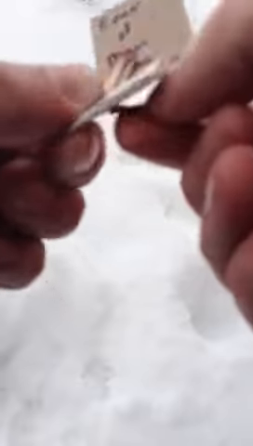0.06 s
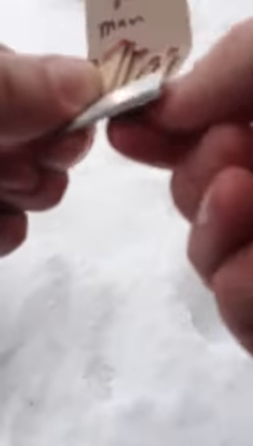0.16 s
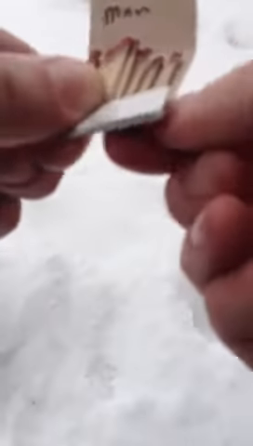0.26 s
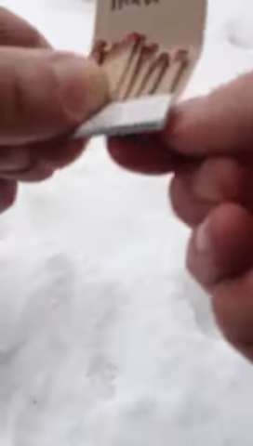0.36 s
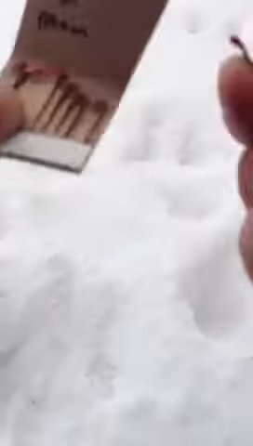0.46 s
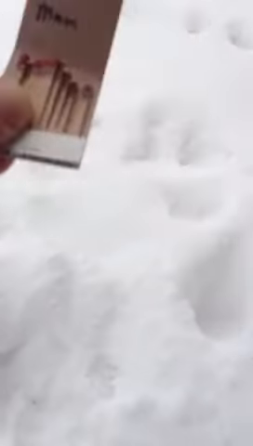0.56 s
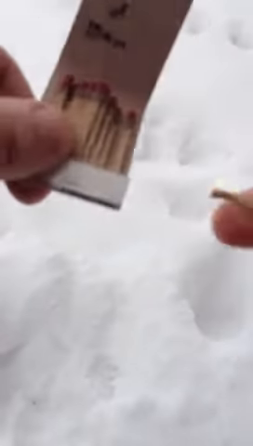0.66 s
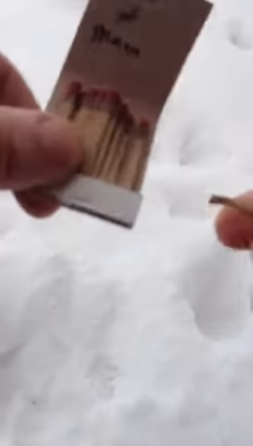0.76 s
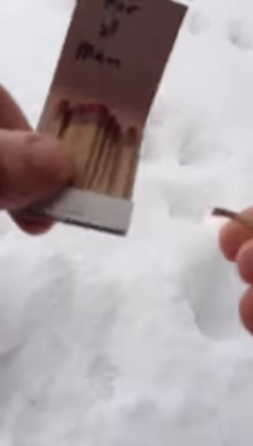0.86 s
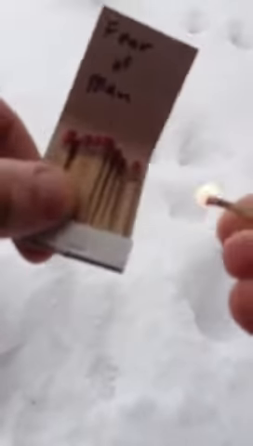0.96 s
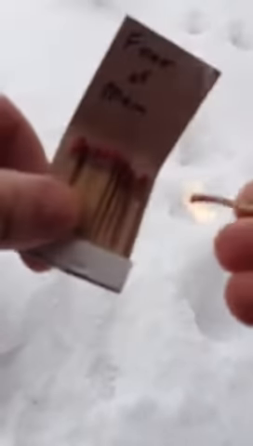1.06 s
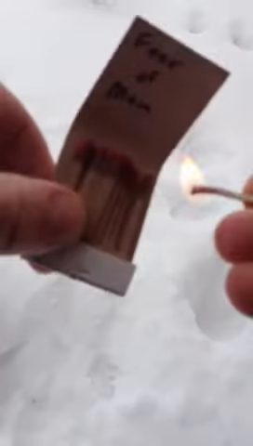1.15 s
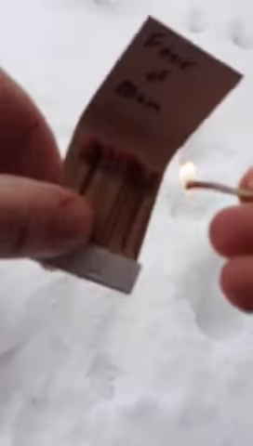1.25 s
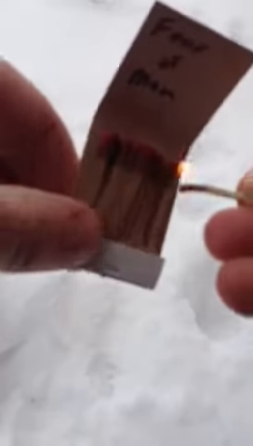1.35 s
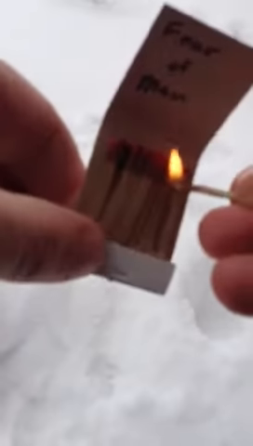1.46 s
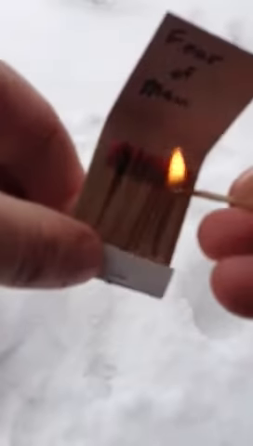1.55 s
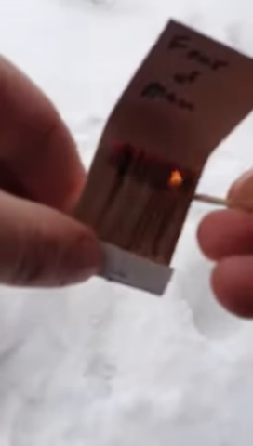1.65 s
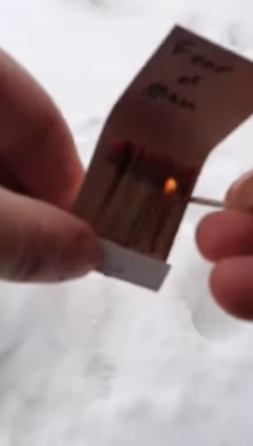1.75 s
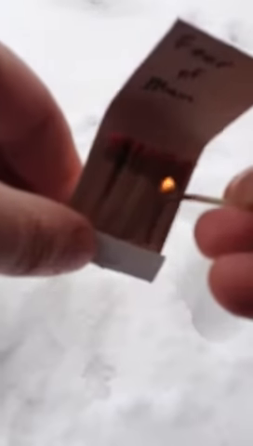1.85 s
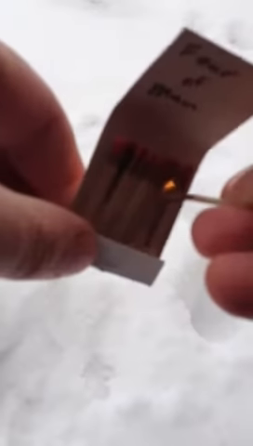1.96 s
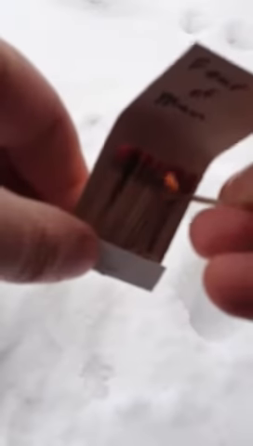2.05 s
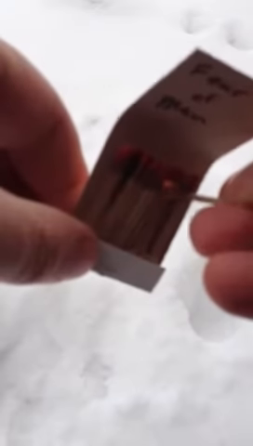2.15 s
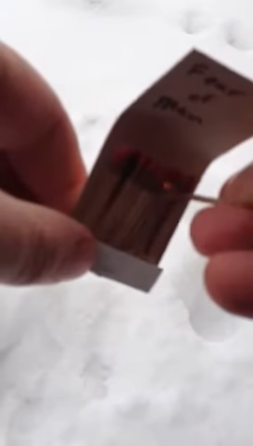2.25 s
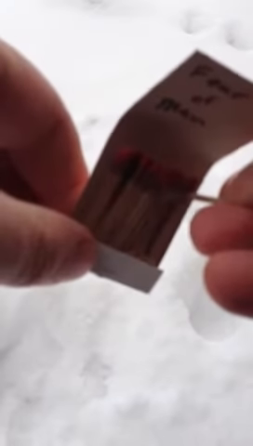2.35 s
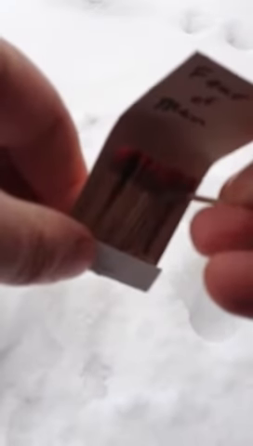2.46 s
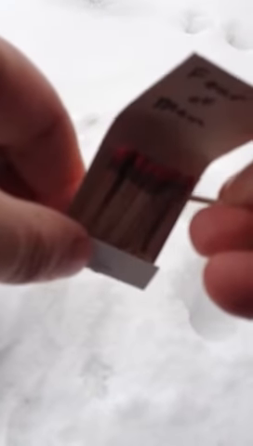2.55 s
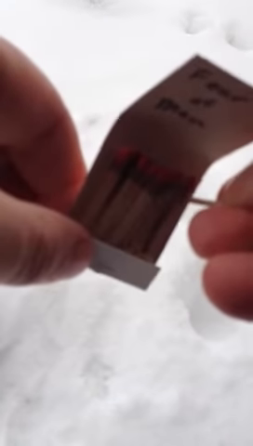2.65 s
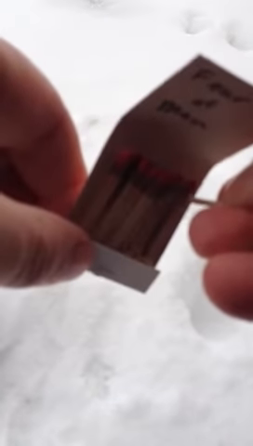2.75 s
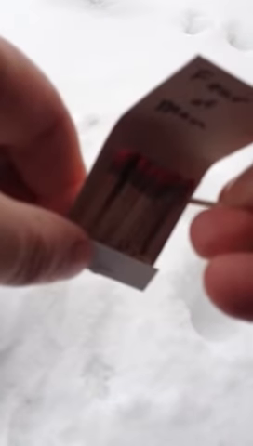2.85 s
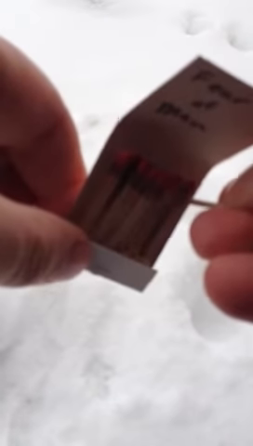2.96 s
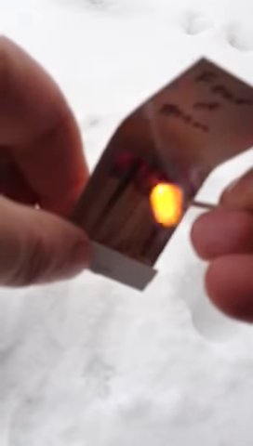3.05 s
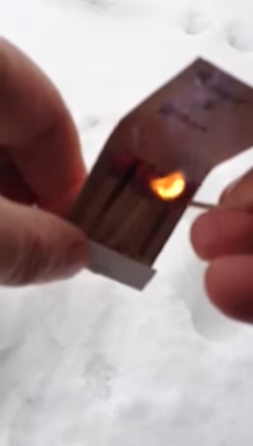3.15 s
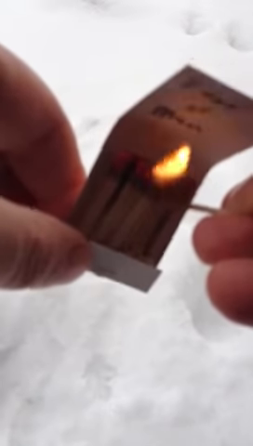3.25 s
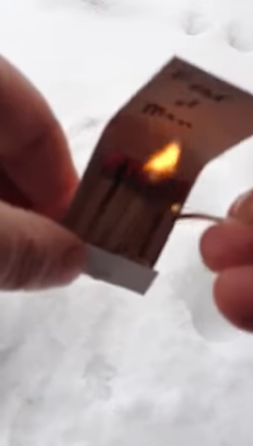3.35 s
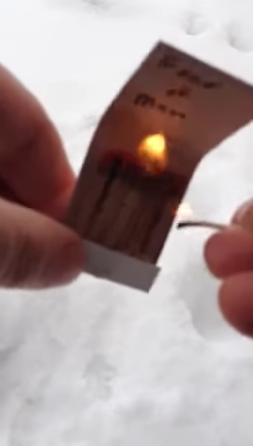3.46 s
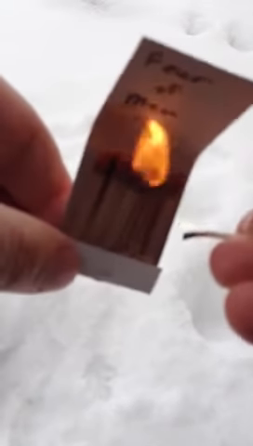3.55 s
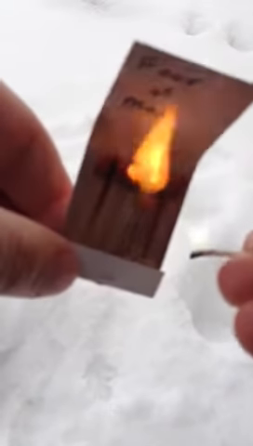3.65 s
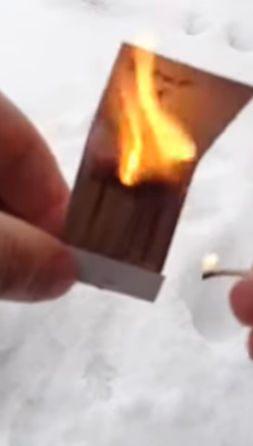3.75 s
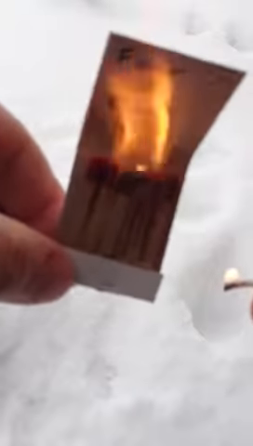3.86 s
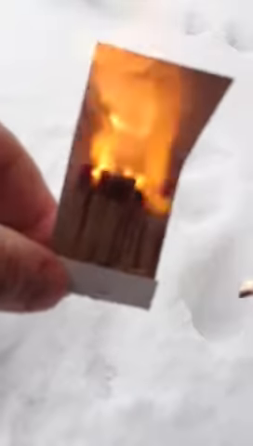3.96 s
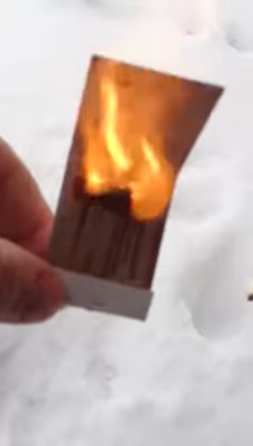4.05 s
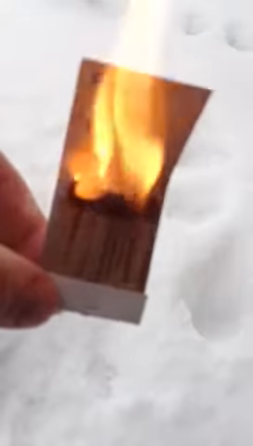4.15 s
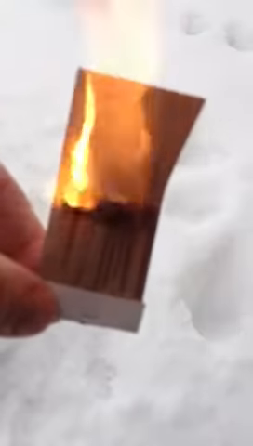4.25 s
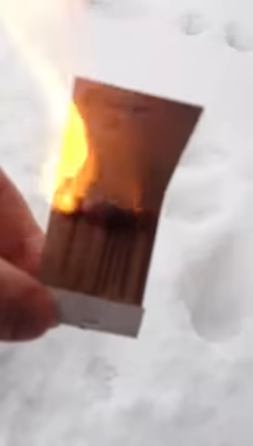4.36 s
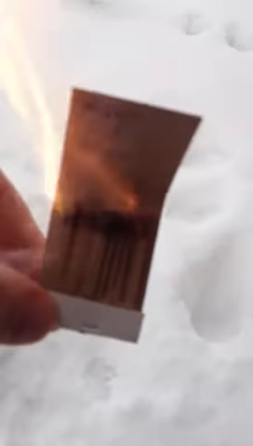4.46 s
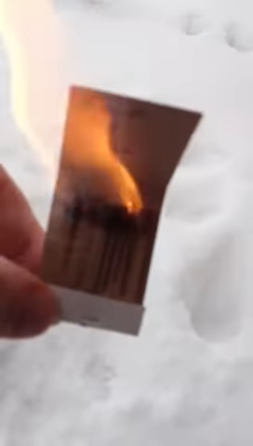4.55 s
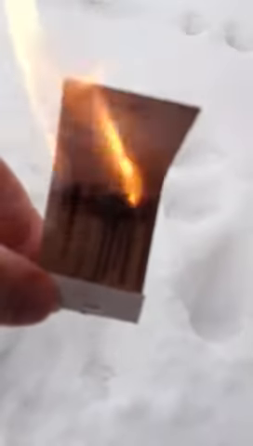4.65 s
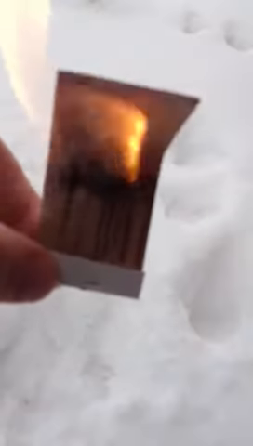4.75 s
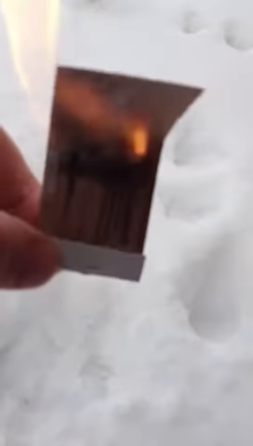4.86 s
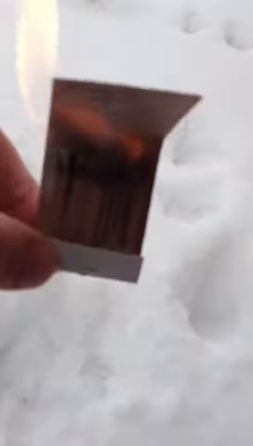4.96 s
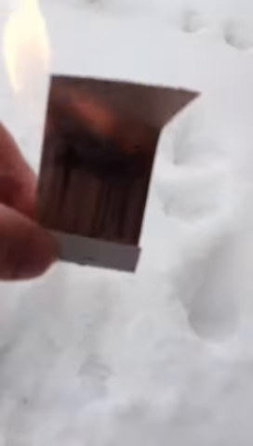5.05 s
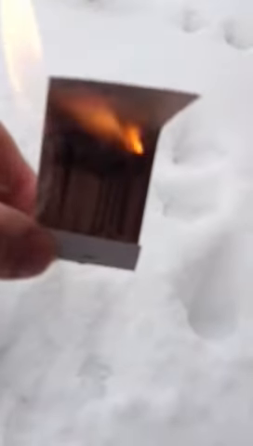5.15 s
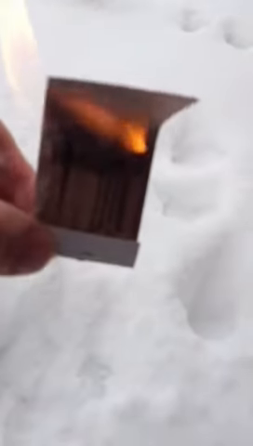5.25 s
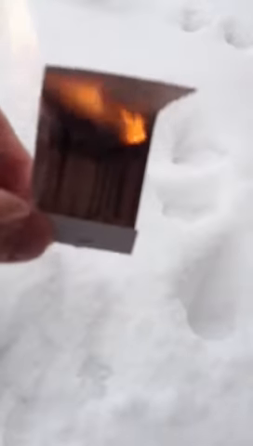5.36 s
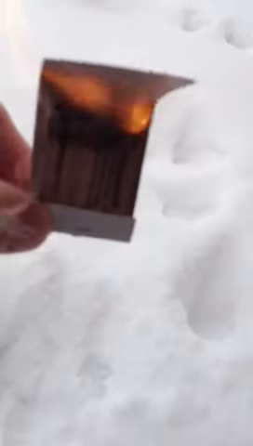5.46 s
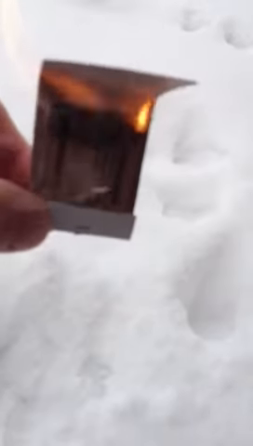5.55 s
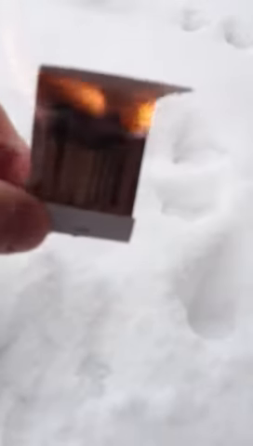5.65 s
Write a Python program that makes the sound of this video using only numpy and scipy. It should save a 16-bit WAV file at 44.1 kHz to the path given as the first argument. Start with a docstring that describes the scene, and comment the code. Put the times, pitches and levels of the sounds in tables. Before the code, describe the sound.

A match scrapes alight and fizzes, then a whole matchbook sputters and flares with a hissing rush outdoors.

```python
"""A match lights a matchbook, outdoors in the snow, close to a phone. Fingers slide on the card; at 0.4 s
the head scrapes over the striker in stick-slip jerks, snaps alight and fizzes out in spurts of gas.
At 3 s one head in the book catches and sputters. From 3.6 s the row flares with a rush that swirls
against the cover and draws up a low draught, then dies down in spurts. Heads and card crack now and then.
Throughout, the open air murmurs under a faint far hum."""
import sys
import numpy as np
from scipy import signal
from scipy.fft import rfft, irfft
from scipy.io import wavfile
from scipy.ndimage import uniform_filter1d

SR = 44100
rng = np.random.default_rng(int(sys.argv[2]) if len(sys.argv) > 2 else 0)


def master(y):
    """Save y as 16-bit WAV."""
    cut = np.clip(np.atleast_2d(y).T, -1, 1)
    pcm = np.round(cut * 32767)  # scale
    wavfile.write(sys.argv[1], SR, pcm.astype(np.int16))


N = 252235
T = np.arange(N) / SR

# Gas jets. Each row: start in seconds, hold in seconds, hiss in dB before trim, roar over hiss in dB.
ROW_FLARES = [(3.585, 0.78, -39, -5.5), (4.0, .3, -39, -6)]  # one half of the row, then the other
BOOK_JETS = [(2.996, .105, -40.5, -7.5), (3.125, .025, -42.5, -11), (3.196, .042, -45, -10),
             (3.289, 0.086, -51, -9.5), (3.404, .004, -50.5, -18), (3.45, 0.011, -55, -20),
             (3.631, 0.045, -43.5, -0.5), (4, .015, -39.5, -2.5), (4.257, .008, -43, -6),
             (4.387, .015, -40.5, -9), (4.498, .002, -43.5, -25), (4.572, 0.11, -43.5, -7),
             (4.728, 0.01, -45.5, -7), (4.772, .012, -45.5, -3.5), (4.848, 0.025, -49.5, -4),
             (4.937, 0.017, -50.5, -4), (5.179, 0.075, -47, -8.5), (5.268, 0.024, -44.5, -6),
             (5.404, .02, -45, -5), (5.458, .01, -45.5, -1.5), (5.528, .02, -51, -0.5),
             (5.577, .006, -48.5, -5), (5.685, .035, -56, 2)]
MATCH_JETS = [(0.497, 0.021, -49, -13), (0.609, 0.011, -54, -12), (0.714, 0.033, -57, -2.5),
              (0.898, .033, -56, -5), (0.96, 0.032, -59.5, -11), (1.02, 0.1, -52.5, -4),
              (1.064, 0.063, -53.5, -0.5), (1.163, 0.018, -57, -5), (1.328, 0.055, -58, -11),
              (1.417, 0.062, -63.5, -4), (1.56, 0.057, -67, -18)]
# Later heads catch more slowly. Each row: start in seconds, attack in seconds.
HEAD_ATTACKS = [(3.0, .007), (4.5, .014)]
# Jerks on the striker. Each row: start in seconds, relative level in dB, decay in seconds,
# ring in Hz, ring boost in dB.
STRIKER_SLIPS = [(0.4263, -37.5, .0016, 4200, 8.5), (0.441, -31.5, 0.0009, 5000, 6),
                 (0.4475, -18.5, 0.0024, 4320, 10.5), (0.4507, -8, 0.0006, 6540, 1.5),
                 (0.4526, -25, 0.01, 12000, 15), (0.455, -15, 0.0026, 530, 17),
                 (0.4584, -17.5, .0034, 930, 10.5), (0.4612, -19, .002, 4276, 9),
                 (0.4638, -21.5, .005, 2980, -1.5), (0.4733, -5, .00065, 7200, 11.5),
                 (0.4744, -12, 0.0021, 2300, 16.5), (0.4748, -29, 0.0045, 210, 22),
                 (0.4756, -13.5, .0018, 4330, 7.5), (0.4779, -24.5, 0.004, 2500, 13),
                 (0.4839, -26.5, .0016, 4014, 12), (0.4857, -17, .0013, 4200, 12),
                 (0.4987, -30.5, 0.0036, 4600, 6), (0.5279, -37, .0008, 5500, 11)]
# Dry cracks of heads and card. Each row: start in seconds, relative level in dB, ring in Hz.
DRY_CRACKS = [(0.62, -36.5, 4500), (1.4408, -38, 4000), (2.0522, -24, 3860), (3.2334, -35, 3500),
              (3.3543, -21.5, 4300), (3.4227, -34, 3520), (3.4506, -20.5, 3930), (3.4674, -25, 5200),
              (3.5774, -27, 3500), (3.9009, -24, 3500), (4.8427, -34, 4000), (5.5893, -28, 3500)]
# Softer pops. Each row: start in seconds, relative level in dB, ring in Hz, ring boost in dB.
RINGING_POPS = [(0.031, -36, 3970, 18), (0.0317, -40, 2350, 29), (0.8305, -43, 635, 14),
                (1.57, -43.5, 4500, 16), (2.0672, -46.5, 12000, 19), (2.3461, -34, 4330, 7),
                (2.3463, -36, 500, 14), (2.6390, -43.5, 1450, 32), (2.948, -50.5, 1600, 30)]
# Resonances between row and cover. Each row: start in seconds, hold in seconds, level in dB,
# initial pitch in Hz, fall in Hz per second.
COVER_RESONANCES = [(3.98, .44, -43, 4620, 2300), (3.85, .28, -49, 6170, 1250),
                    (4.25, .07, -54, 7600, 1000)]
# Detour round the tilting cover. Each row: time in seconds, delay in milliseconds.
COVER_DELAYS = [(3.6, 0.53), (3.9, 0.61), (5.72, 0.593)]
# Reflections off cover and fingers. Each row: multiple of the cover delay, signed gain.
COVER_ECHOES = [(1, -0.053), (1.499, 0.051), (1.87, -0.047), (2.2, 0.0062), (2.749, -0.024),
                (3.699, -0.072), (5.3, -0.021)]
# Far hum. Each row: pitch in Hz, level in dB.
HUM_LINES = [(178, -72), (287, -71)]
# Its swells. Each row: start in seconds, hold in seconds, pitch in Hz, level in dB.
HUM_RISES = [(1.33, 0.42, 180, -59.5), (2.651, 0.23, 287.4, -65.5)]
# Source spectra. Each row: frequency in Hz, relative density in dB.
FIRST_HEAD_SPECTRUM = [(80, -23), (250, -6), (850, -4.5), (1150, -4.5), (1350, -10), (1600, -7),
                       (1980, -16.5), (2600, -5), (4500, 1), (5100, -10), (6600, -14.5), (7800, -26),
                       (11000, -27.5), (15000, -23.5)]
BLAZE_SPECTRUM = [(50, -34), (170, -7), (600, -0.5), (1050, 0), (1350, -8), (1600, -3.5), (1900, -7.5),
                  (3400, 2.5), (4400, 1.5), (5100, -8.5), (6200, -6.5), (7700, -8.5), (9800, -22.5),
                  (15000, -22)]
LAST_HEADS_SPECTRUM = [(35, -45), (130, -6.5), (300, -6.5), (600, -1.5), (1000, -4), (1350, -10.5),
                       (1650, -2), (2100, -4.5), (3400, 1.5), (4400, 2), (5050, -14.5), (7300, -7.5),
                       (9800, -27.5), (15000, -23.5)]
MATCH_SPECTRUM = [(40, -37.5), (150, -16), (450, 0.5), (850, 0), (1400, -6), (2050, -8), (2700, -3.5),
                  (3700, -4), (4550, 1), (5100, -7), (6200, -6), (7500, -9), (10000, -20.5), (15000, -18)]
SCRAPE_SPECTRUM = [(30, -22), (90, -22), (170, -4.5), (280, -7), (750, -3), (1400, -4.5), (2000, -9.5),
                   (2500, -7), (4400, 1), (5200, -5.5), (6500, -3), (8200, -6), (9500, -17.5), (15000, -12)]
RUB_SPECTRUM = [(200, -10.5), (500, 8.5), (1000, 0), (1700, -8.5), (2300, 3), (2900, -6.5), (4600, -1.5),
                (5100, -11), (7000, -10.5), (10000, -23), (15000, -18.5)]
POP_SPECTRUM = [(40, -34), (250, 1), (1000, 0.5), (2050, -7.5), (2800, -1.5), (4400, 3.5), (5200, -8),
                (6400, -4.5), (7300, -12), (9500, -21), (15000, -23)]
DRAUGHT_SPECTRUM = [(30, -33), (70, -30), (110, -4), (170, 3), (280, 2), (520, 7), (800, -3.5), (1400, -18),
                    (4000, -50)]
AIR_SPECTRUM = [(25, -37.5), (60, -22), (100, -7.5), (150, 2.5), (230, -3), (450, -5), (800, -8),
                (1300, -15.5), (2100, -20), (4300, -22), (7000, -27.5), (9700, -39), (12000, -33),
                (15000, -31)]

BOOK_LIT_S, BLAZE_START_S, SECOND_FLARE_S = 3.0, ROW_FLARES[0][0], ROW_FLARES[1][0]
FLARE_ATTACK_S, FLARE_RELEASE_S = 0.019, 0.17


def matchbook():
    """Few heads sputter, many merge into a smooth rush; the colour shifts as fire runs along the row."""
    embers = spurt(BOOK_LIT_S, hold_s=T[-1], db=-54)
    jets = [(embers, embers * undb(-4.5))] + jet_gains(BOOK_JETS)
    jets += jet_gains(ROW_FLARES, FLARE_ATTACK_S, FLARE_RELEASE_S)
    hiss, roar = power_sum(jets)
    sputter = np.interp(20 * np.log10(hiss), [-48, -35], [1, 0.35])
    gas = gas_jet(sputter, flutter_db=1.8, flutter_hz=95.1)
    caught = np.interp(T, [3.45, 3.75], [0, 1])
    spent = np.interp(T, [4.35, 4.85], [0, 1])
    rush = ((1 - caught) * colour(gas, FIRST_HEAD_SPECTRUM)
            + (caught - spent) * colour(gas, BLAZE_SPECTRUM)
            + spent * colour(gas, LAST_HEADS_SPECTRUM))
    # The first head spits brighter while its coating burns off.
    spit_db = 4.5 * envelope(BOOK_LIT_S, hold_s=0.089, attack_s=0.007, release_s=0.028)
    fizz_db = np.interp(T, [BLAZE_START_S, SECOND_FLARE_S], [-22, -16]) + spit_db
    return flame(rush, hiss, roar, roar_trim_db=-0.35, hiss_trim_db=0.02, fizz_db=fizz_db, flicker_db=1.2)


def match():
    """One head fizzes up and burns away in crackling spurts."""
    burn = spurt(start_s=0.5, hold_s=0.665, db=-62.5)
    jets = [(burn, burn * undb(-3.5))] + jet_gains(MATCH_JETS, attack_s=0.005, release_s=0.019)
    hiss, roar = power_sum(jets)
    gas = colour(gas_jet(sputter=0.91, flutter_db=2.0, flutter_hz=70.2), MATCH_SPECTRUM)
    return flame(gas, hiss, roar, roar_trim_db=-1.0, hiss_trim_db=0.36, fizz_db=-19.5, flicker_db=2.5)


def gas_jet(sputter, flutter_db, flutter_hz, grains_per_s=900):
    """Gas leaves the heads in uneven puffs with tiny bursting grains; sputter (0-1) deepens both."""
    flutter = (walk(flutter_hz) + 1.32 * walk(420)) / np.sqrt(2)
    puffs = undb(sputter * flutter_db * flutter)
    puffs /= np.sqrt(uniform_filter1d(puffs ** 2, SR // 10))
    grain_db = 3.0 * np.minimum(rng.exponential(size=N), 3.2)
    bursting = rng.random(N) < grains_per_s / SR
    grains = unit(bursting * undb(grain_db) * np.sign(noise()))
    share = sputter * undb(-5.5)
    return puffs * (noise() + share * grains) / np.sqrt(1 + share ** 2)


def flame(gas, hiss, roar, roar_trim_db, hiss_trim_db, fizz_db, flicker_db):
    """A jet heard as low turbulent roar, hiss and a fine fizz that loosely follows the hiss."""
    reference, fizz_db_per_hiss_db, smooth_s = undb(-44.5), 0.71, 0.03
    smooth_hiss = np.abs(uniform_filter1d(hiss, int(smooth_s * SR)))
    fizz = reference * (smooth_hiss / reference) ** fizz_db_per_hiss_db
    low = band(gas, 0, 1400) * undb(roar_trim_db + flicker_db * walk(35))
    middle = band(gas, 1400, 9000) * undb(hiss_trim_db)
    top = band(gas, 9000, 16000) * undb(fizz_db)
    return low * roar + middle * hiss + top * fizz


def spurt(start_s, hold_s, db, attack_s=None, release_s=0.022):
    """Gas flow of a head: catches quickly, holds, gives out."""
    attack_s = attack_s or np.interp(start_s, *np.transpose(HEAD_ATTACKS))
    return undb(db) * envelope(start_s, hold_s, attack_s, release_s)


def jet_gains(table, attack_s=None, release_s=0.022):
    """A (hiss, roar) pair of gain curves for each jet."""
    jets = []
    for start_s, hold_s, hiss_db, roar_db in table:
        hiss = spurt(start_s, hold_s, hiss_db, attack_s, release_s)
        jets.append((hiss, hiss * undb(roar_db)))
    return jets


def strike():
    """Fingers slide on the card, pressing harder; the head catches, grinds and snaps off the striker."""
    full_s, growth_db_per_s = 0.297, 24
    rub_db = -57.5 - growth_db_per_s * np.maximum(full_s - T, 0) + 0.7 * walk(30)
    contact = envelope(0, hold_s=full_s + 0.21, attack_s=0.01, release_s=0.012)
    rub = colour(noise(), RUB_SPECTRUM) * undb(rub_db) * contact
    return rub + undb(5.0) * bursts(STRIKER_SLIPS, SCRAPE_SPECTRUM, crack=2.16, ring_octaves=0.32)


def pops(crack_decay_s=0.00048, crack_ring_db=8.5, pop_decay_s=0.0022):
    """Gas pockets burst and the card ticks."""
    cracks = [(start_s, db, crack_decay_s, hz, crack_ring_db) for start_s, db, hz in DRY_CRACKS]
    ringing = [(start_s, db, pop_decay_s, hz, ring_db) for start_s, db, hz, ring_db in RINGING_POPS]
    return undb(2.5) * bursts(cracks + ringing, POP_SPECTRUM, crack=8.0, ring_octaves=0.78)


def bursts(table, spectrum, crack, ring_octaves, size=4096):
    """Sharp cracks, each with a dying shower of grit, rung through the card and one broad resonance."""
    out, age_s = np.zeros(N + size), np.arange(size) / SR
    base_db, hz = spectrum_db(spectrum, size)
    for start_s, db, decay_s, ring_hz, ring_db in table:
        fall = np.exp(-age_s / max(decay_s, 1e-4))
        push = rng.standard_normal(size) * fall
        push[0] += crack
        gain_db = base_db + ring_db / (1 + (np.log2(hz / ring_hz) / ring_octaves) ** 2)
        cepstrum = irfft(np.log(undb(gain_db)))
        cepstrum[1:size // 2] *= 2  # minimum phase: the ring follows the push
        cepstrum[size // 2 + 1:] = 0
        hit = irfft(rfft(push) * np.exp(rfft(cepstrum)))
        hit *= np.sqrt(np.sum(fall ** 2) / np.sum(hit ** 2)) / 2
        start = int(start_s * SR)
        out[start:start + size] += undb(db) * hit
    return out[:N]


def climbing(x, lag_ms_per_s=0.16):
    """The flame climbs the cover; its reflection lags and fades, so notches glide down."""
    lag_ms = 0.19 + lag_ms_per_s * np.maximum(T - BLAZE_START_S, 0)
    share = 0.32 * envelope(BLAZE_START_S, hold_s=0, attack_s=FLARE_ATTACK_S, release_s=0.42)
    return (x - share * delayed(x, lag_ms / 1000)) / np.sqrt(1 + share ** 2)


def off_cover(x):
    """Short reflections off cover and fingers; their notches slide as the book tilts."""
    delay_s = np.interp(T, *np.transpose(COVER_DELAYS)) / 1000
    multiples, gains = np.transpose(COVER_ECHOES)
    echoes = gains @ delayed(x, np.outer(multiples, delay_s))
    return (x + echoes) / np.sqrt(1 + np.sum(gains ** 2))


def swirl(half_width_hz=280):
    """Three narrow noise bands ring between row and cover, sinking as the flame grows."""
    lowpass = signal.butter(2, half_width_hz, fs=SR, output="sos")
    out = np.zeros(N)
    for start_s, hold_s, db, initial_hz, fall_hz_per_s in COVER_RESONANCES:
        hz = initial_hz - fall_hz_per_s * np.maximum(T - start_s, 0)
        ring = unit(signal.sosfilt(lowpass, noise())) * sine(hz)
        out += ring * undb(db) * envelope(start_s, hold_s, attack_s=0.14, release_s=0.044)
    return out


def draught():
    """Hot air rises with a fluttering rumble over the tall flame, then faintly over the embers."""
    column = undb(-47.5) * envelope(start_s=4.1, hold_s=0.29, attack_s=0.19, release_s=0.065)
    embers = spurt(BLAZE_START_S, hold_s=T[-1], db=-59.5)
    return colour(noise(), DRAUGHT_SPECTRUM) * power_sum([column, embers]) * undb(2.0 * walk(30))


def outdoors():
    """Low murmur of open air and a far hum that swells twice."""
    air = colour(noise(), AIR_SPECTRUM) * undb(-59.5 + 0.85 * walk(14))
    swells = sum(hum(hz, db) * envelope(start_s, hold_s, attack_s=0.07, release_s=0.07)
                 for start_s, hold_s, hz, db in HUM_RISES)
    return air + swells + sum(hum(hz, db) for hz, db in HUM_LINES)


def hum(hz, db):
    """One line, wavering in pitch and level."""
    return sine(hz * (1 + 0.008 * walk(14))) * undb(db + 0.93 * walk(9.8))


def envelope(start_s, hold_s, attack_s, release_s):
    """Gain that reaches 1 at start_s, holds and decays; attack and release are time constants."""
    return np.exp(-np.maximum(start_s - T, 0) / attack_s - np.maximum(T - start_s - hold_s, 0) / release_s)


def power_sum(gains):
    """Unrelated flows add in power."""
    return np.sqrt(np.sum(np.square(gains), axis=0) + 1e-18)


def delayed(x, delay_s):
    """Moving fractional delay."""
    fine = signal.resample(x, 4 * N)
    return np.interp(T - delay_s, np.arange(4 * N) / (4 * SR), fine)


def spectrum_db(spectrum, size):
    """Level in dB and frequency in Hz of each FFT bin."""
    hz, db = np.transpose(spectrum)
    bin_hz = np.maximum(np.fft.rfftfreq(size, 1 / SR), 1)
    return np.interp(np.log(bin_hz), np.log(hz), db), bin_hz


def colour(x, spectrum):
    """Spectral shaping; rms 1."""
    gain_db, _ = spectrum_db(spectrum, N)
    return unit(irfft(rfft(x) * undb(gain_db), N))


def band(x, low_hz, high_hz):
    """Brick-wall bandpass; rms 1."""
    hz = np.fft.rfftfreq(N, 1 / SR)
    return unit(irfft(rfft(x) * ((hz >= low_hz) & (hz < high_hz)), N))


def walk(rate_hz):
    """Smooth random curve; rms 1."""
    size = int(SR / rate_hz)
    steps = np.repeat(rng.standard_normal(N // size + 1), size)
    return unit(uniform_filter1d(steps, size)[:N])


def sine(hz):
    """Sine of moving pitch; rms 1."""
    return np.sqrt(2) * np.sin(2 * np.pi * np.cumsum(hz) / SR)


def noise():
    """White noise."""
    return rng.standard_normal(N)


def undb(db):
    """Decibels to gain."""
    return 10 ** (np.asarray(db) / 20)


def unit(x):
    """Scale to rms 1."""
    return x / np.sqrt(np.mean(x ** 2) + 1e-20)


def scene():
    """All sources at one point, the same on both channels."""
    fire = off_cover(match() + climbing(matchbook()) + pops())
    return np.tile(strike() + fire + draught() + outdoors() + swirl(), (2, 1))


def record(dry, cutoff_hz=15350):
    """The phone cuts the top steeply."""
    return signal.sosfilt(signal.ellip(14, 0.2, 70, cutoff_hz, fs=SR, output="sos"), dry)


dry = scene()
out = record(dry)
master(out)
```